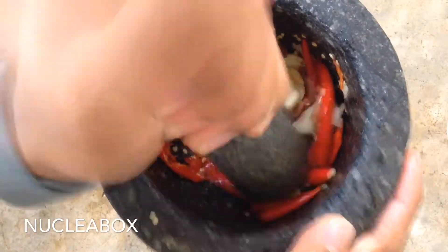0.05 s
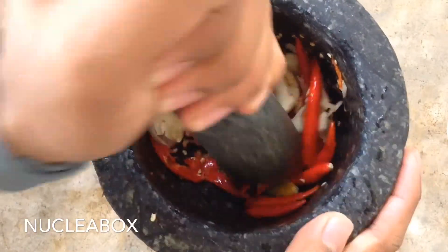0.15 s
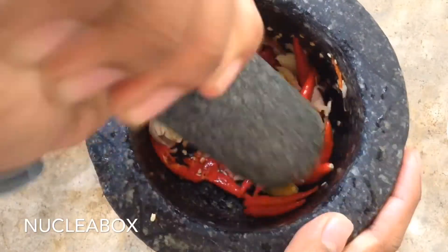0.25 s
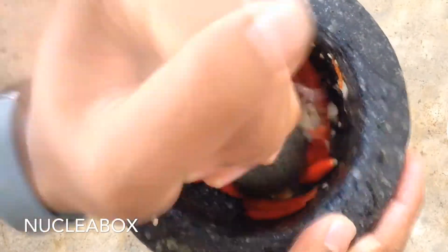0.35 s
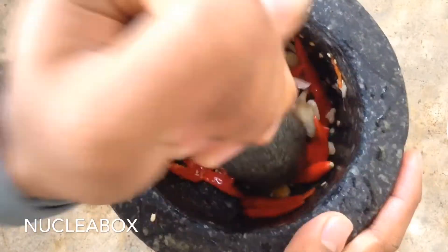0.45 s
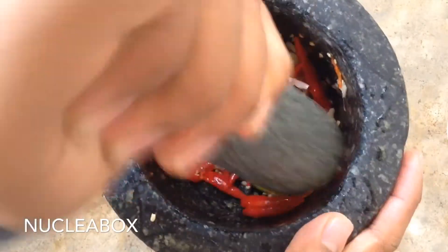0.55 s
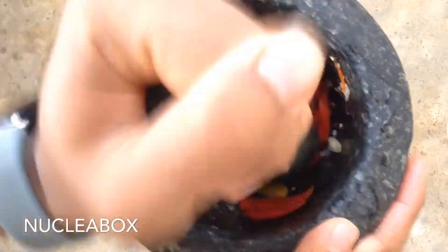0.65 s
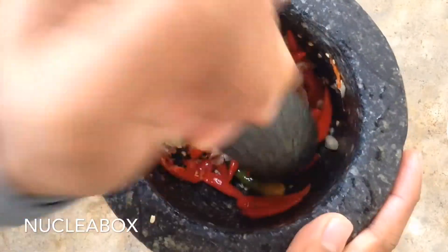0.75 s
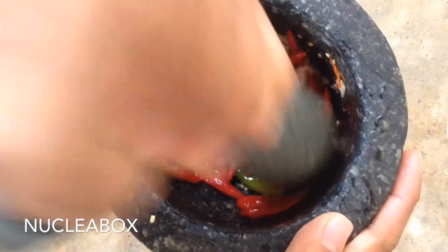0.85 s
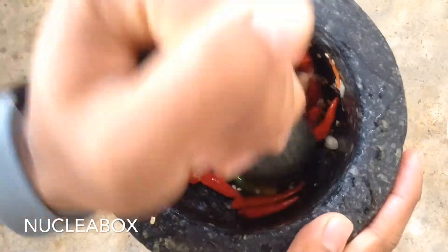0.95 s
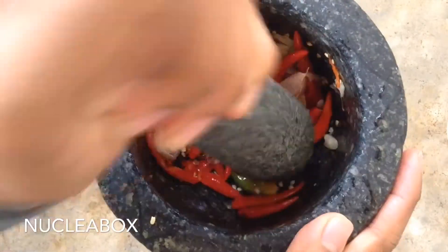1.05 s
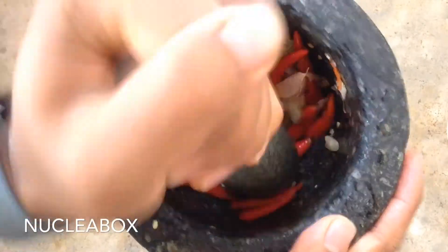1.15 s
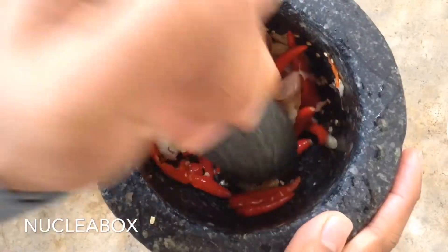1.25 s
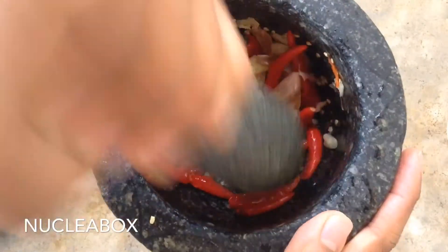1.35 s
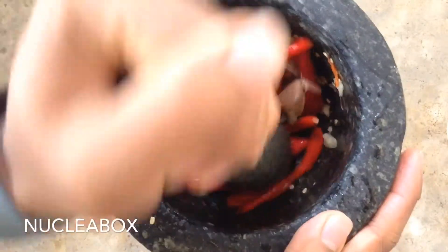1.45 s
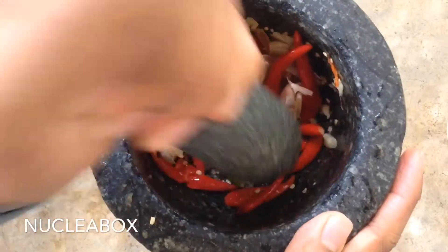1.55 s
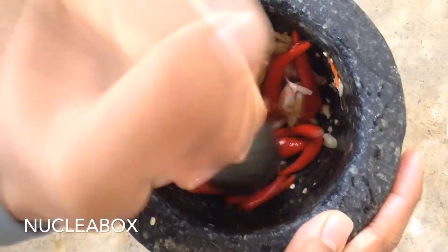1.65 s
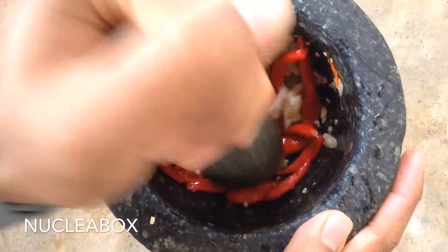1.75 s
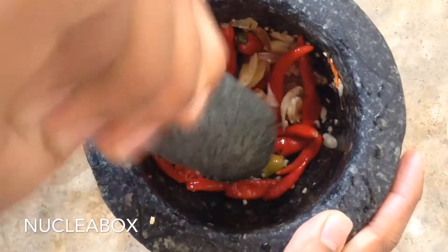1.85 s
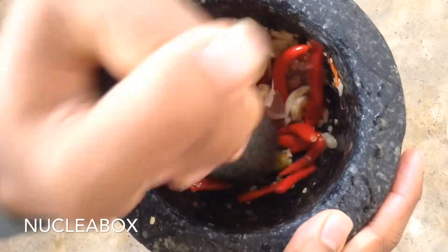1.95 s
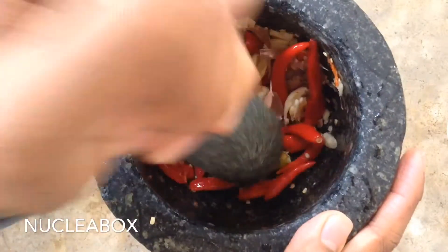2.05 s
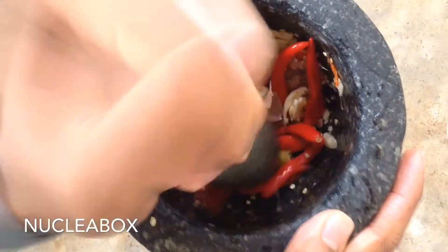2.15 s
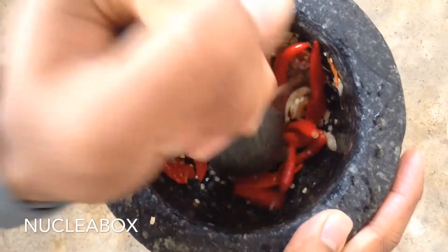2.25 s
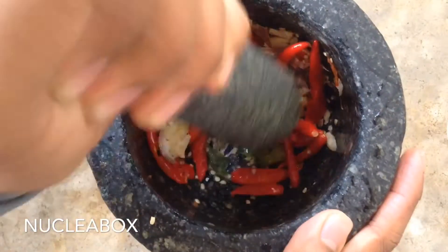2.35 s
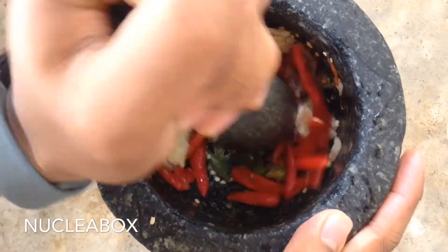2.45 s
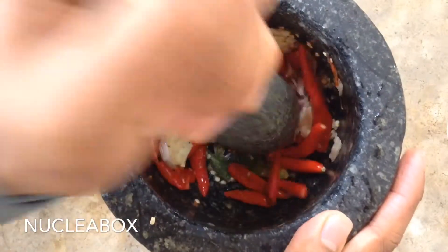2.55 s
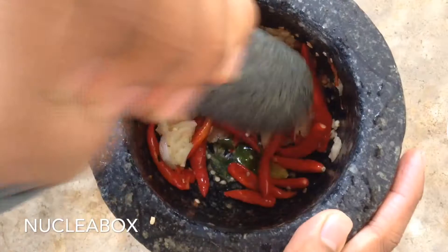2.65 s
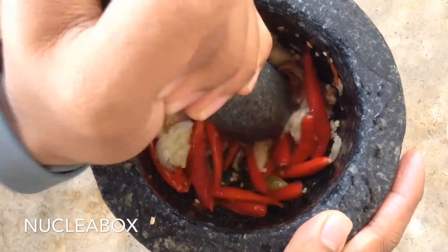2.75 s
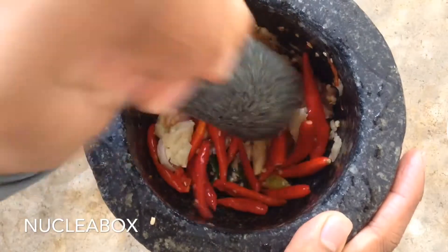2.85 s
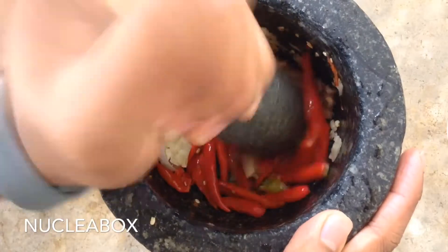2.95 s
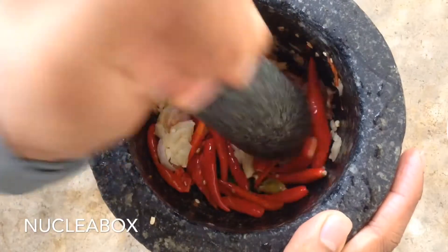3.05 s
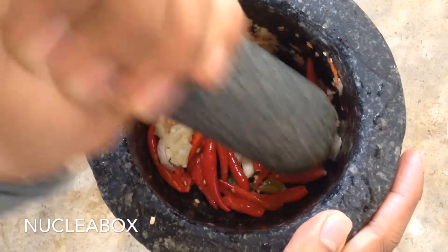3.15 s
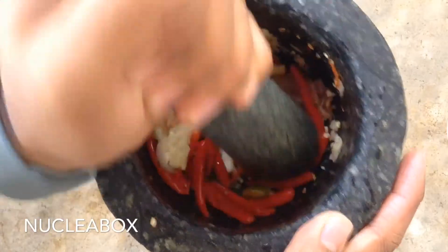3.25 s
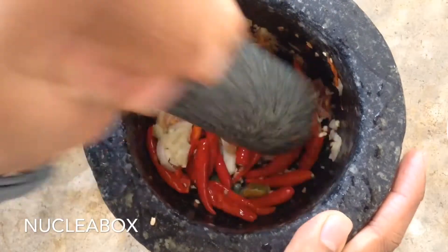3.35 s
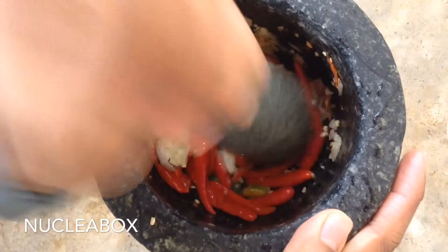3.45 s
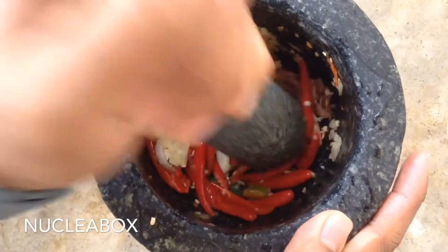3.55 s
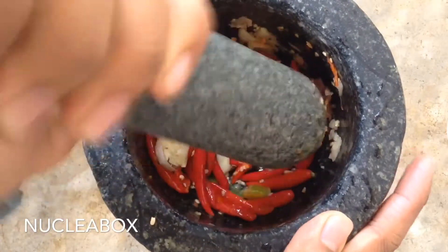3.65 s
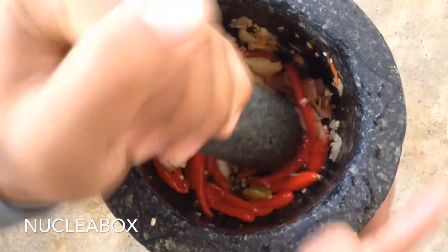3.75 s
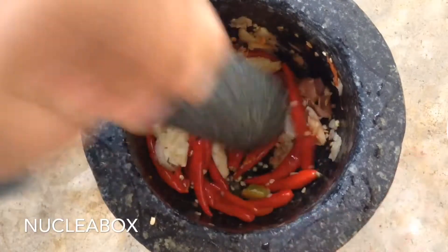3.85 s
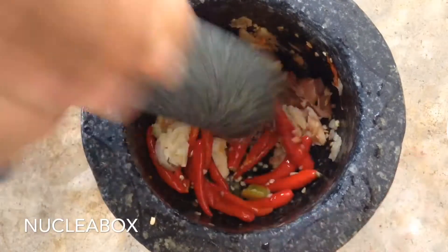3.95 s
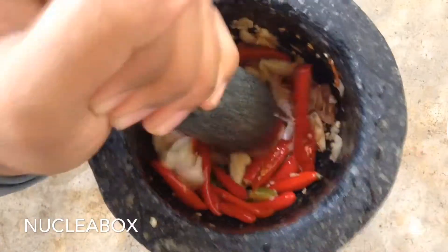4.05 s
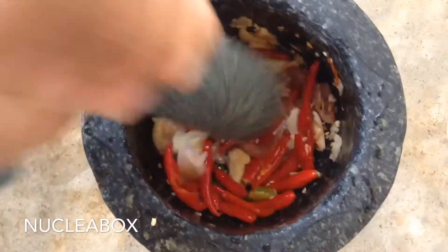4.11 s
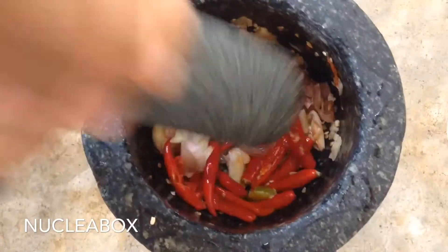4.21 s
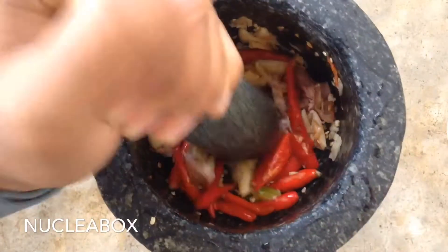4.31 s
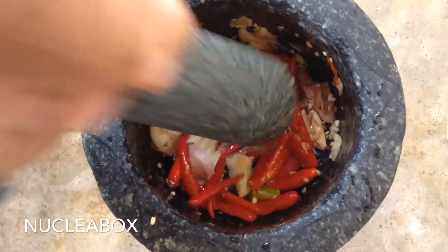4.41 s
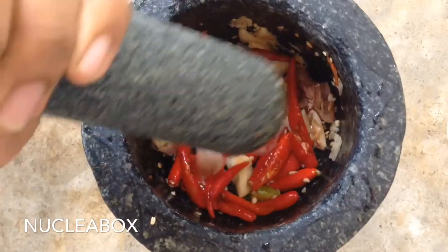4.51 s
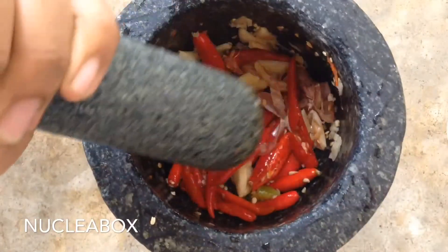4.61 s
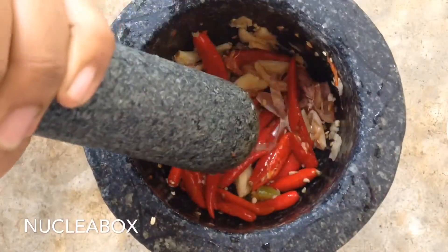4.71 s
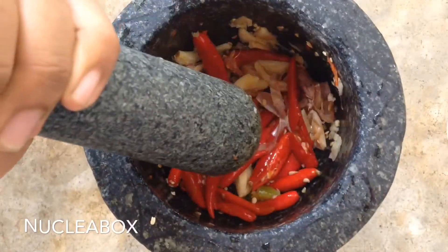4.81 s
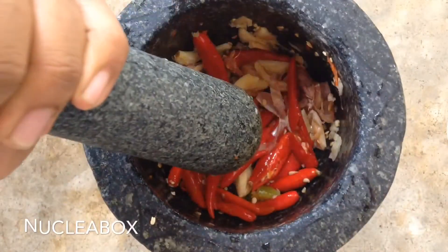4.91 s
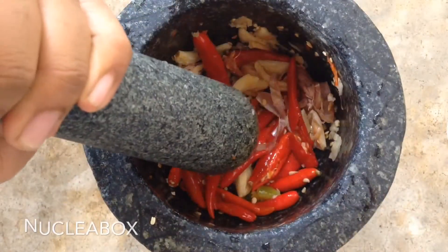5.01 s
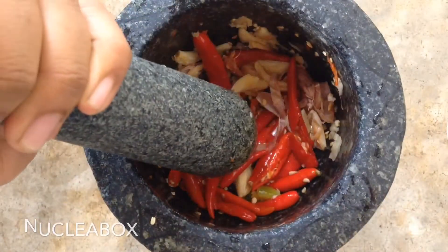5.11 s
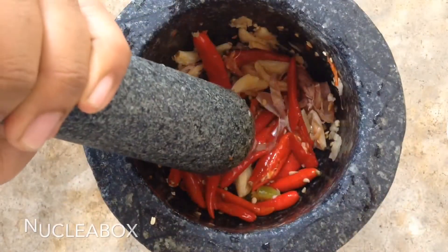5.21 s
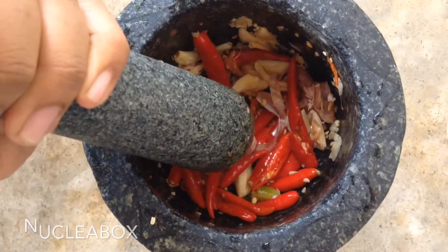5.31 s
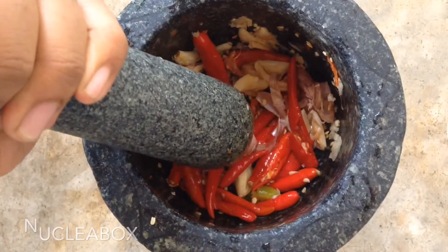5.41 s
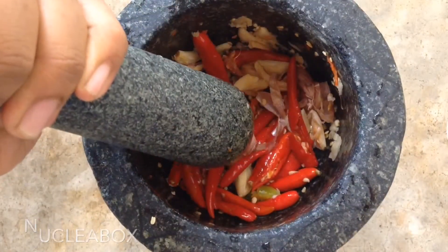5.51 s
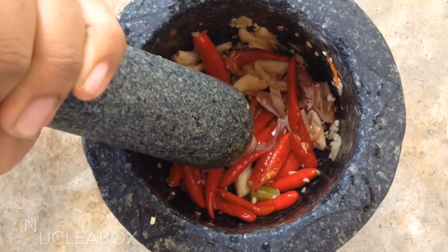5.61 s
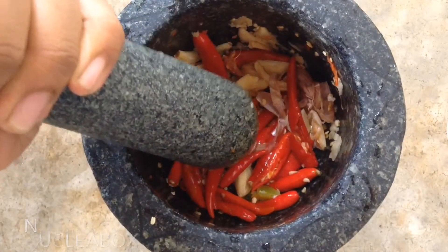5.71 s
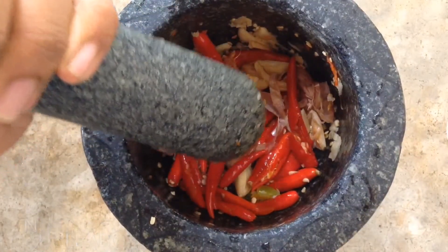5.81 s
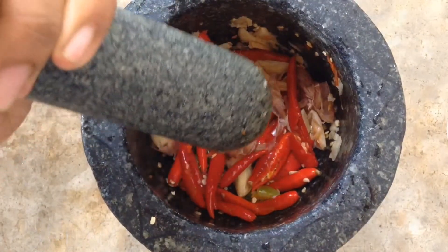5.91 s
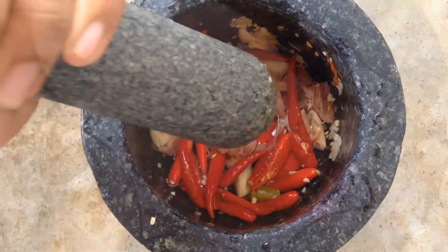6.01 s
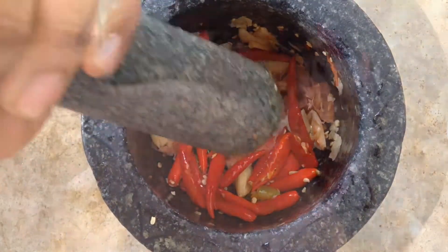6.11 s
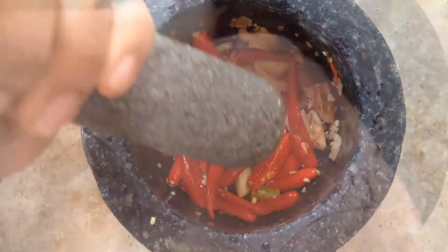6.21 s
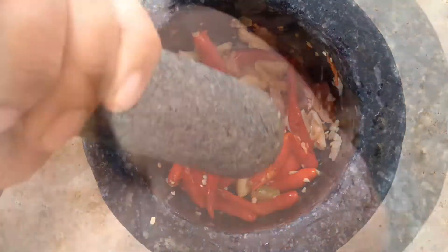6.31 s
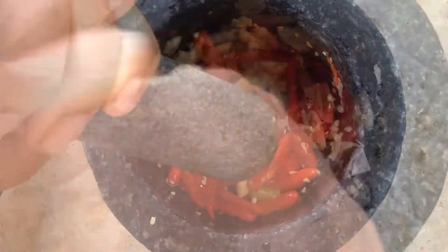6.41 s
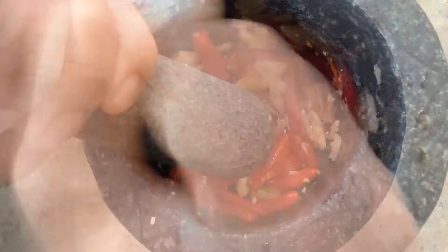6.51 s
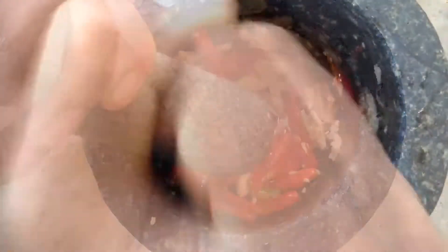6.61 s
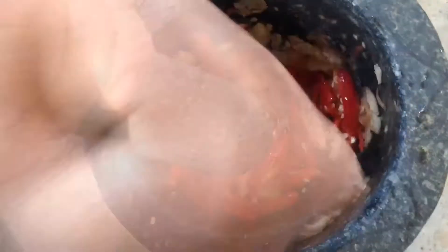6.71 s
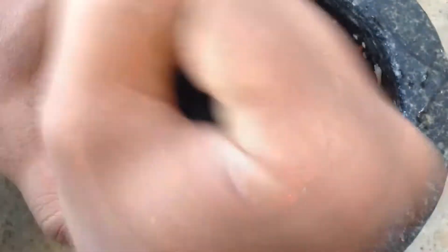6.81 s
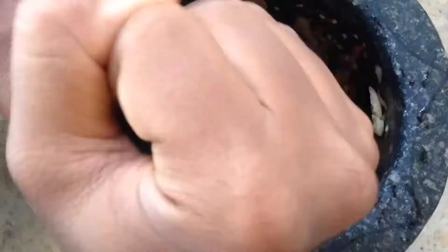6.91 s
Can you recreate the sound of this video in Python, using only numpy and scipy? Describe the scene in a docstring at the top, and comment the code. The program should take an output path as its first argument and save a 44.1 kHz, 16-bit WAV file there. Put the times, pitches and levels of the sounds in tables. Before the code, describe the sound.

A stone pestle pounds chillies and garlic in a stone mortar, about four blows a second, close up in a small hard room. Each blow mixes a wet crunch with a smack and a low thud. Skins snap, a few early strikes clink on bare stone, and the mortar knocks as it rocks. After about four seconds the pounding stops, and faint air and hum swell once and fade.

```python
"""A stone pestle pounds chillies and garlic in a stone mortar, close up in a small hard room.
Over faint air and hum, blows fall about four a second: wet flesh crunches, the bowl smacks, the
floor thuds, and the mortar tips and knocks on its foot. From 0.4 s tough skins snap; three blows
between 0.6 and 2.2 s reach bare stone and clink. At 3.9 s the steadying hand lets go and the mortar
rocks on longer. After the last blow at 4.3 s, the air and hum swell once and fade."""
import sys
import numpy as np
from scipy import signal
from scipy.fft import rfft, irfft, next_fast_len
from scipy.io import wavfile
from scipy.ndimage import uniform_filter1d

SR = 44100
rng = np.random.default_rng(int(sys.argv[2]) if len(sys.argv) > 2 else 0)


def wrap_up_sound(samples):
    """Save the sound to the file named by the first command line argument, as 16-bit audio."""
    columns = np.atleast_2d(samples).T
    # keep every value between -1 and 1, then stretch to whole-number steps
    tamed = np.clip(columns, -1, 1)
    steps = np.round(tamed * 32767).astype(np.int16)
    wavfile.write(sys.argv[1], SR, steps)


N = 307192


def amp(db):
    """Decibels to gain."""
    return 10 ** (np.asarray(db) / 20)


def unit(x):
    """Scales to rms 1."""
    return x / np.sqrt(np.mean(x ** 2) + 1e-20)


def read(points, hz):
    """Interpolates a table over log frequency."""
    table_hz, value = np.transpose(points)
    return np.interp(np.log(hz + 1), np.log(table_hz + 1), value)


def add(mix, at_s, sound):
    """Mixes a sound in, cropped to the mix."""
    start = round(at_s * SR)
    part = mix[max(start, 0):][:len(sound) + min(start, 0)]
    part += sound[max(-start, 0):][:len(part)]


def colour(x, spectrum):
    """Filters by a table of (frequency [Hz], gain [dB])."""
    size = next_fast_len(len(x), True)
    gain = amp(read(spectrum, np.fft.rfftfreq(size, 1 / SR)))
    return irfft(rfft(x, size) * gain, size)[:len(x)]


# air spectrum: (frequency [Hz], gain [dB])
AIR_SPECTRUM = [(18, -82.5), (30, -56), (79, -34), (103, -9), (189, -1.5), (336, -8), (394, -17),
                (554, -14.5), (702, -14.5), (866, -8.5), (1720, -18.5), (2540, -20), (4780, -36),
                (14400, -46), (16000, -58.5)]
# hum partials: (frequency [Hz], level re air [dB])
HUM_PARTIALS = [(187, -8.5), (559.9, -16.5), (850.6, -16.5), (1348, -19.5), (2580, -27)]

def air_and_hum(level_db=-55, waver=.5, swell_db=3.5, swell_at_s=5.79, half_width_s=0.38, fade_s=0.66):
    """Soft rushing air with a wavering hum; swells once, then fades."""
    t = np.arange(N) / SR
    air = unit(colour(rng.standard_normal(N), AIR_SPECTRUM))
    for hz, db in HUM_PARTIALS:
        drift = unit(colour(rng.standard_normal(N), [(3, 0), (12, -20), (40, -100)]))
        air += amp(db) * np.sqrt(2) * np.sin(2 * np.pi * hz * t + 2 * drift) * (1 + waver * drift)
    swell = np.exp(-((t - swell_at_s) / half_width_s) ** 2)
    fade = np.minimum((N / SR - t) / fade_s, 1)
    return unit(air) * amp(level_db + swell_db * swell) * fade


# spectra of wet flesh and the hollow bowl: (frequency [Hz], gain [dB])
FLESH_SPECTRUM = [(100, -7.5), (400, -15), (1300, -11.5), (2300, 2), (4000, 2), (7000, -1), (10000, -2.5),
                  (15000, -5.5)]
BOWL_SPECTRUM = [(60, -41.5), (150, -14), (350, -13), (550, -12), (780, 1.5), (1100, -13), (1600, -9.5),
                 (4000, -38)]

def crunch(rise_s, fall_s, bright_hz, bowl_db=-15, focus_db=8, focus_octaves=0.71):
    """Tiny cell bursts swarm as the pestle sinks in and die as it stops; peak at mid-buffer."""
    t = np.arange(-4096, 4096) / SR
    pressure = np.exp(np.minimum(t / rise_s, -t / fall_s)) * (t > -4.2 * rise_s)
    grains_db = 4 * np.minimum(rng.exponential(1, len(t) // 8), 4).repeat(8)
    clumps_db = rng.uniform(-3.4, 3.4, len(t) // 64).repeat(64)
    bursts = rng.standard_normal(len(t)) * amp(grains_db + clumps_db) * pressure
    octaves = np.log2((np.fft.rfftfreq(len(t), 1 / SR) + 1) / bright_hz)
    focus = amp(focus_db * np.exp(-(octaves / focus_octaves) ** 2))
    wet = unit(colour(irfft(rfft(bursts) * focus), FLESH_SPECTRUM))
    hollow = unit(colour(rng.standard_normal(len(t)) * pressure, BOWL_SPECTRUM))
    return (wet + amp(bowl_db) * hollow) * np.sqrt(np.mean(pressure ** 2))


def snap(hz, band_ratio=1.5, fall_s=0.00033):
    """Skin splits or pulp lets go: a bright band-limited click, peak 1."""
    t = np.arange(512) / SR
    band = signal.butter(2, [hz / band_ratio, min(hz * band_ratio, SR / 2 - 1)], "band", fs=SR)
    click = signal.lfilter(*band, rng.standard_normal(len(t)) * np.exp(-t / fall_s))
    return click / abs(click).max()


# pestle strokes, each a main crunch with a softer, longer one just before, around or after it:
# (time [s], main crunch [dB], give time [s], brightness [Hz], soft crunch offset [s], soft crunch [dB],
# thud [dB], smack [dB])
PESTLE_STROKES = [(0.0869, -11, 0.0043, 5280, -0.011, -29, -28, -20.5),
                  (0.385, -16, 0.0068, 5400, -0.013, -33, -27.5, -22),
                  (0.6593, -20.5, 0.0039, 9500, 0.015, -18.5, -44, -13),
                  (0.916, -14.5, 0.00097, 3300, -0.0032, -19.5, -32, -7),
                  (1.1713, -13.5, 0.0014, 7400, 0.00061, -24.5, -26, -24),
                  (1.4288, -17, 0.0017, 8500, 0.0056, -24, -36, -33),
                  (1.6865, -9, 0.0012, 4320, 0.0012, -30.5, -21, -22.5),
                  (1.9471, -9, .0017, 7415, .016, -24, -16, -15),
                  (2.1924, -7.5, 0.00089, 2600, -0.0053, -26.5, -20, 0),
                  (2.456, -23, 0.0065, 5530, 0.025, -33.5, -46.5, -54),
                  (2.728, -20, 0.0064, 3650, 0.03, -23.5, -51.5, -16.5),
                  (2.9869, -16.5, .0036, 7500, .009, -26, -18.5, -29),
                  (3.24, -17, .0035, 4430, -0.0061, -28.5, -36.5, -29),
                  (3.503, -6, 0.0018, 4540, -.022, -32.5, -16.5, -24),
                  (3.7649, -9, 0.0027, 4170, 0.0034, -35, -27.5, -24),
                  (4.020, -21, 0.0047, 2950, 0.011, -24.5, -42, -28),
                  (4.309, -18, 0.0031, 5700, -0.0015, -32, -20.5, -15.5)]
# tough skins splitting: (time [s], peak [dB], pitch [Hz])
SKIN_SNAPS = [(0.393, -9.5, 7000), (0.9217, -1.5, 6000), (1.429, -2.5, 5500), (2.4435, -22, 5000),
              (2.9707, -16, 8000), (3.2411, -0.5, 6300), (3.710, -25, 7500), (4.3098, 1, 5750)]

def chillies(crackles=4, crackle_db=-37, scatter_db=3, crackle_span_s=.11, crackle_hz=6500):
    """Flesh crunches under each stroke, wet pulp crackles as the pestle lifts, some skins snap."""
    out = np.zeros(N)
    for at_s, db, give_s, bright_hz, soft_offset_s, soft_db, _, _ in PESTLE_STROKES:
        main = amp(db) * crunch(give_s, 1.05 * give_s, bright_hz)
        soft = amp(soft_db) * crunch(1.4 * give_s, 0.012, bright_hz)
        start_s = at_s - len(main) / 2 / SR
        add(out, start_s, main)
        add(out, start_s + soft_offset_s, soft)
        for lateness, size in zip(rng.random(crackles), rng.standard_normal(crackles)):
            gain = amp(crackle_db + scatter_db * size) * (1 - lateness)
            add(out, at_s + crackle_span_s * lateness, gain * snap(crackle_hz))
    for at_s, db, hz in SKIN_SNAPS:
        add(out, at_s, amp(db) * snap(hz))
    return out


def landings(sink=.9, weight_lag_s=.003, drop_thud_db=-23.5, drop_smack_db=-9.5):
    """Weight comes down, pestle through flesh or mortar on foot: (time [s], thud [dB], smack [dB])."""
    pestle = [(at_s + sink * give_s, thud_db, smack_db)
              for at_s, _, give_s, *_, thud_db, smack_db in PESTLE_STROKES]
    mortar = [(at_s + weight_lag_s, db + drop_thud_db, db + drop_smack_db) for at_s, db in MORTAR_DROPS]
    return pestle + mortar


def rough_push(cutoff_hz, fall_s):
    """Rough contact: a low-passed burst of noise."""
    t = np.arange(4096) / SR
    pressure = np.exp(-t / fall_s)
    lowpass = signal.butter(4, min(cutoff_hz, SR / 2 - 1), fs=SR)
    push = signal.lfilter(*lowpass, rng.standard_normal(len(t)) * pressure)
    return unit(push) * np.sqrt(np.mean(pressure ** 2))


# bowl body under a smack: (frequency [Hz], gain [dB])
BODY_RESPONSE = [(50, -31.5), (140, -17), (280, -4), (900, 3.5), (1300, -5.5), (2000, -4.5), (2700, -3.5),
                 (5000, -13)]

def smacks(cushioned_hz=467, hard_extra_hz=2350):
    """Stone comes to a stop; the less flesh cushions it, the brighter."""
    out = np.zeros(N)
    for at_s, _, db in landings():
        add(out, at_s, amp(db) * rough_push(cushioned_hz + hard_extra_hz * amp(db), fall_s=0.0028))
    return colour(out, BODY_RESPONSE)


def ring(modes, contact_s, vary_db, detune):
    """Decaying modes, eased in over the contact; strength, pitch and sign vary with the spot struck."""
    t = np.arange(0, max(t60_s for _, _, t60_s in modes), 1 / SR)
    draws = rng.uniform(-1, 1, (len(modes), 3))
    tones = np.zeros(len(t))
    for (hz, db, t60_s), (strength, shift, polarity) in zip(modes, draws):
        envelope = amp(db + vary_db * strength - 60 * t / t60_s)
        tones += np.sign(polarity) * envelope * np.sin(2 * np.pi * hz * (1 + detune * shift) * t)
    return tones * (1 - np.exp(-(t / contact_s) ** 2))


# modes of the floor and of a nearby object: (frequency [Hz], level [dB], T60 [s])
BOOM_MODES = [(99.5, -17.5, .3), (150, -3, 0.049), (205.1, 2, 0.15), (207, -5, 0.038), (289.5, -12, .2),
              (328.3, -12.5, 0.2)]
NEARBY_MODES = [(400.3, -1.5, 1.5)]
# sympathetic rings: (time [s], level [dB])
NEARBY_RINGS = [(2.193, -40.5), (4.311, -43.5)]

def thuds(contact_s=0.0059):
    """Blows boom through the mortar into the floor; two hard ones set something nearby ringing."""
    out = np.zeros(N)
    for at_s, db, _ in landings():
        add(out, at_s, amp(db) * ring(BOOM_MODES, contact_s, vary_db=3, detune=0.0074))
    for at_s, db in NEARBY_RINGS:
        add(out, at_s, amp(db) * ring(NEARBY_MODES, contact_s, vary_db=0, detune=0))
    return out


# tipped mortar dropping back on its foot: (time [s], level [dB])
MORTAR_DROPS = [(0.127, -20), (0.150, -12.5), (0.438, -13.5), (0.659, -10), (0.673, -11.5), (0.7064, 0.5),
                (1.223, -21), (1.479, -21), (2.194, -6.5), (2.7351, -14), (3.304, -20.5), (3.815, -27),
                (4.0494, -11)]

def rocking(count=6, gap_s=.05, shrink=.86, limp=.18, let_go_s=3.9, held_loss_db=18, free_loss_db=4):
    """Each drop rocks on unevenly, faster and weaker, damped while held: (time [s], level [dB])."""
    for at_s, db in MORTAR_DROPS:
        loss_db = held_loss_db if at_s < let_go_s else free_loss_db
        for k in range(count):
            yield at_s, db - k * loss_db
            at_s += gap_s * shrink ** k * (1 + limp * (-1) ** k)


# mortar struck at its foot: (frequency [Hz], level [dB], T60 [s])
KNOCK_MODES = [(296, -28.5, 0.067), (470, -11, 0.062), (523, -8, 0.024), (743, -7.5, 0.065),
               (817, -6.5, 0.02), (970, -20.5, .06), (1155, -23, 0.11), (1260, -26, 0.15),
               (1490, -20.5, 0.07)]
# transmission of the cushioned foot: (frequency [Hz], gain [dB])
FOOT_RESPONSE = [(40, -29), (130, -10.5), (260, 3), (900, 1.5), (1400, -8.5), (2200, -24), (4000, -52)]

def knocks(rattle_db=-10, hardening=0.39):
    """The rocking mortar hits its foot with a gritty rattle; harder knocks are brighter."""
    out = np.zeros(N)
    for at_s, db in rocking():
        hardness = amp(hardening * db)
        add(out, at_s, amp(db) * ring(KNOCK_MODES, contact_s=0.00058 / hardness, vary_db=2, detune=0.023))
        add(out, at_s, amp(db + rattle_db) * rough_push(1400 * hardness, fall_s=0.0019))
    return colour(out, FOOT_RESPONSE)


# pestle on bare stone: (time [s], clink [dB], pestle ring [dB])
BARE_HITS = [(0.6185, -2.5, -50.5), (0.9155, -3, -29), (2.1925, -24, -66.5)]
# modes of bowl and pestle: (frequency [Hz], level [dB], T60 [s])
CLINK_MODES = [(470, -10.5, 0.027), (1550, -17.5, 0.045), (1777, -14.5, 0.039), (1886, 0, 0.029),
               (2803, -8.5, 0.023), (3047, -17, 0.084), (3196, -9, 0.077), (3900, -15, 0.029),
               (7900, -29.5, .025)]
LINGER_MODES = [(2936, -16, 0.36), (3360, -8, .3), (3110, 0, 0.47), (3227, -14.5, 0.43), (1925, -12.5, .3),
                (7000, -23.5, .2)]

def clinks(grit_db=-19, flutter_depth=1.3):
    """Stone on stone: the bowl clinks grittily; the pestle rings on, fluttering in the moving hand."""
    out = np.zeros(N)
    for at_s, db, linger_db in BARE_HITS:
        add(out, at_s, amp(db) * ring(CLINK_MODES, contact_s=0.00081, vary_db=1, detune=.003))
        add(out, at_s, amp(db + grit_db) * rough_push(3200, fall_s=0.0072))
        linger = ring(LINGER_MODES, contact_s=.003, vary_db=3.5, detune=0.0037)
        grip = unit(uniform_filter1d(rng.standard_normal(len(linger)), size=300))
        add(out, at_s, amp(linger_db) * linger * (1 + flutter_depth * grip))
    return out


# room decay: (frequency [Hz], T60 [s])
ROOM_DECAY = [(150, 0.38), (400, 0.43), (1000, 0.44), (3000, 0.45), (7000, 0.36), (15000, 0.65)]
# room response: (frequency [Hz], gain [dB])
ROOM_RESPONSE = [(100, -16), (220, 2), (400, 2), (800, -11.5), (1500, -7.5), (3000, -13), (7000, -14),
                 (15000, -20.5)]

def room(x, build_s=0.006, density=.15):
    """Dense reflections of random sign; each band decays at its own rate."""
    taps = rng.choice([-1., 1.], SR) * (rng.random(SR) < density)
    hz, t, bands = signal.stft(taps, SR, nperseg=256)
    t60_s = read(ROOM_DECAY, hz)[:, None]
    tail = signal.istft(bands * amp(-60 * t / t60_s) / np.sqrt(t60_s), SR, nperseg=256)[1]
    tail *= 1 - np.exp(-(np.arange(len(tail)) / SR / build_s) ** 2)
    return signal.fftconvolve(x, colour(tail / np.linalg.norm(tail), ROOM_RESPONSE))[:N]


def shifting_reflections(x):
    """The moving arm changes the paths: three sets of reflections take turns."""
    phase = np.arange(N) / SR * 2 * np.pi
    return sum(room(x * np.sqrt(2 / 3) * np.cos(phase + k * np.pi / 3)) for k in range(3))


# knock path through the floor to the room: (frequency [Hz], gain [dB])
FLOOR_PATH = [(100, -2), (200, -1), (320, 4), (450, -4.5), (800, -1.5), (1500, 6.5)]

def scene(walls=3):
    """Close sounds, their reflections and the background; mono."""
    clink, knock, boom = clinks(), knocks(), thuds()
    ring_echo = shifting_reflections(amp(-6.5) * clink + colour(knock, FLOOR_PATH) + amp(-6) * boom)
    # crunches and smacks send each wall its own fine pattern, so their echo is a smooth hiss
    hiss = sum(room(amp(-4) * chillies() + amp(3.5) * smacks()) for _ in range(walls)) / np.sqrt(walls)
    close = chillies() + smacks() + clink + knock + boom
    return (close + ring_echo + hiss + air_and_hum())[None]


def record(dry, bass_hz=75, edge_hz=15700):
    """Peaks overload the input, the small microphone loses deep bass, the top is band-limited."""
    clipped = np.clip(dry, -1, 1)
    thinned = signal.lfilter(*signal.butter(2, bass_hz, "high", fs=SR), clipped)
    band_limit = signal.firwin(255, edge_hz, window=("kaiser", 8), fs=SR)
    return signal.oaconvolve(thinned, band_limit[None], "same")


dry = scene()
out = record(dry)
wrap_up_sound(out)
```